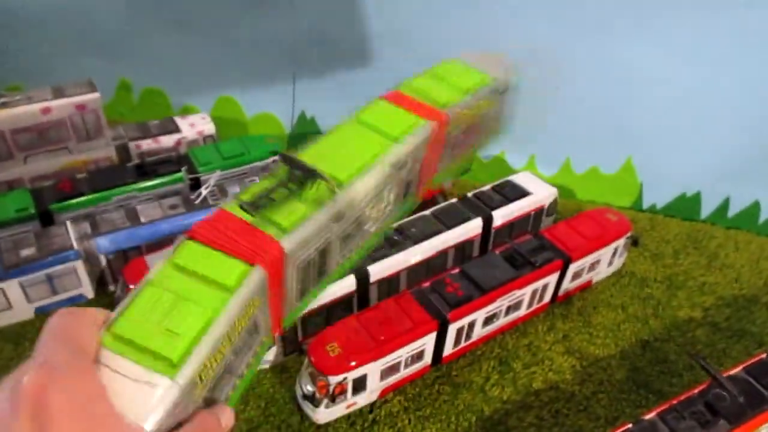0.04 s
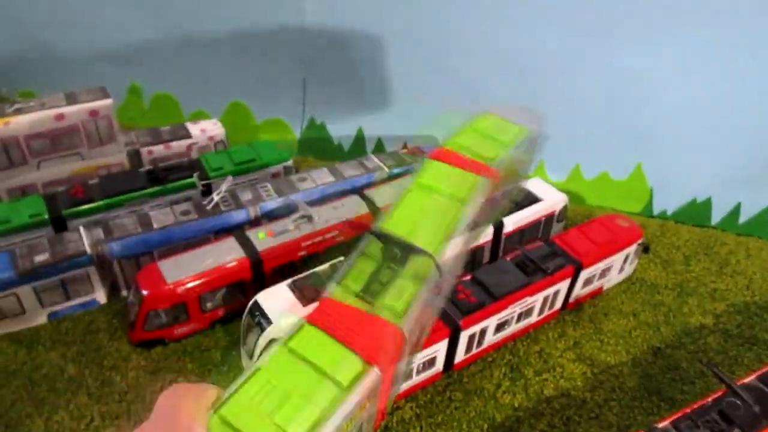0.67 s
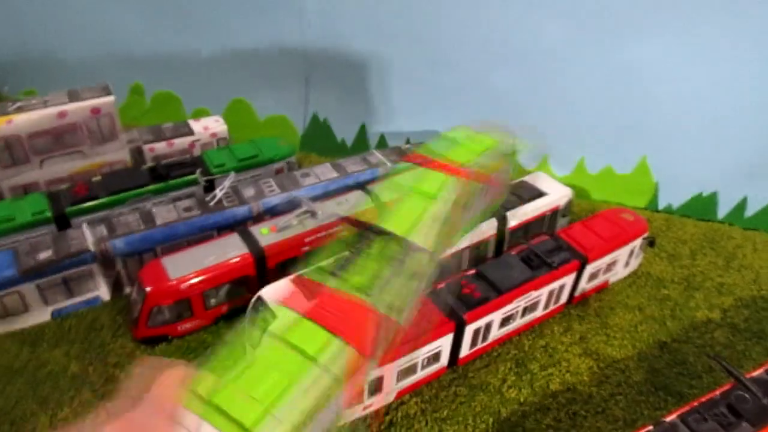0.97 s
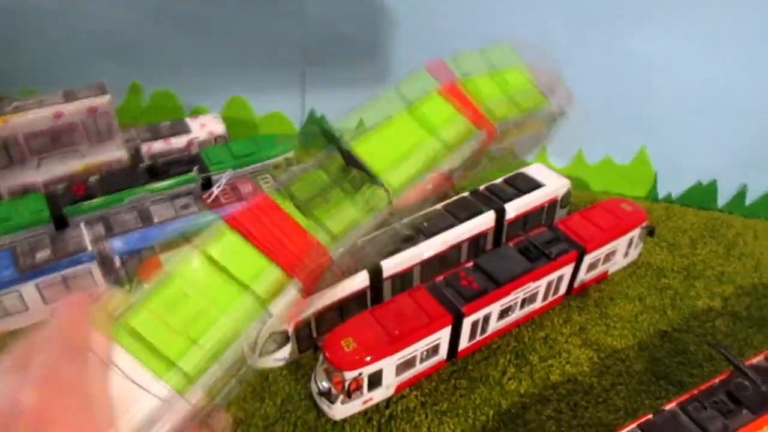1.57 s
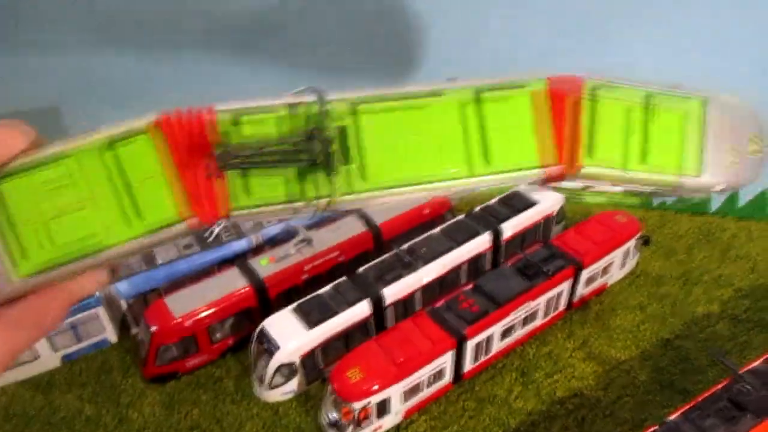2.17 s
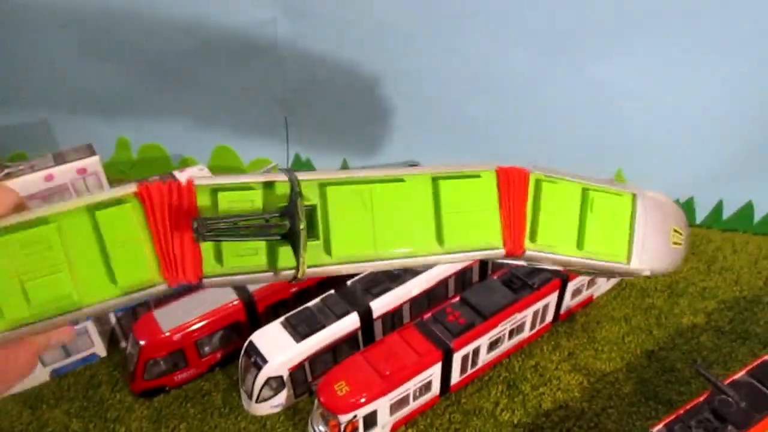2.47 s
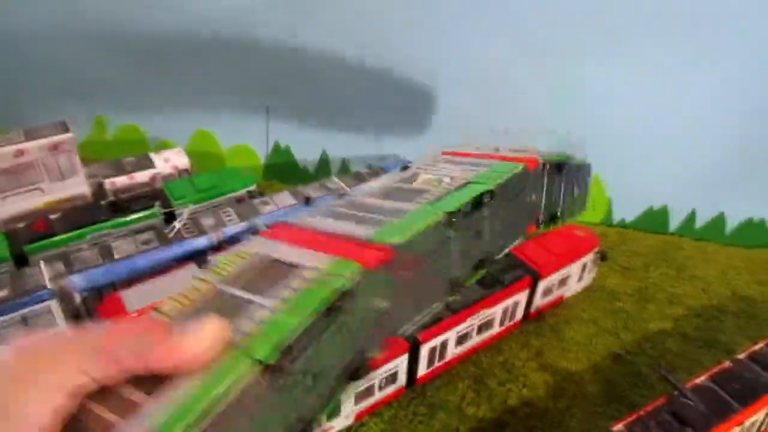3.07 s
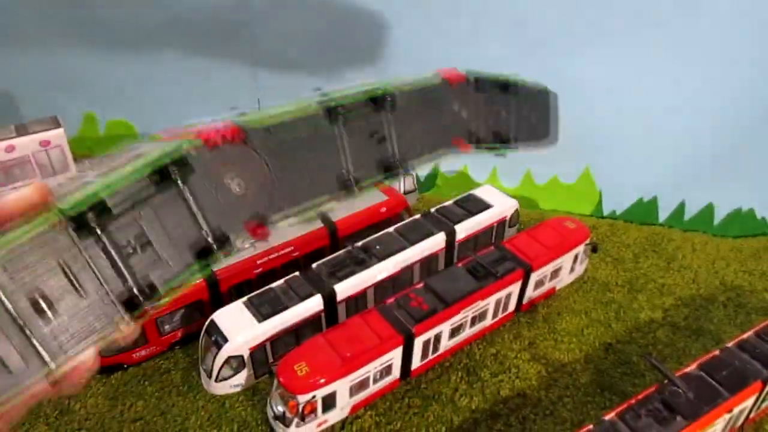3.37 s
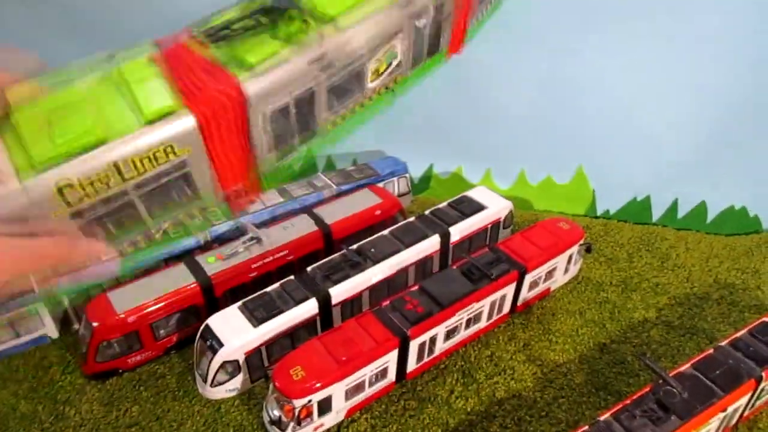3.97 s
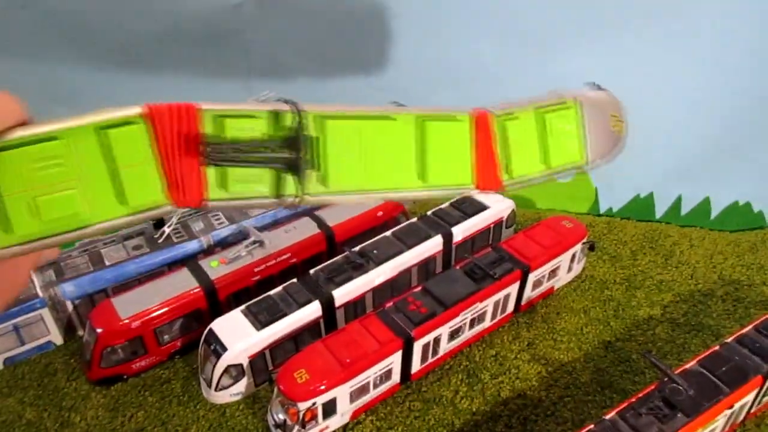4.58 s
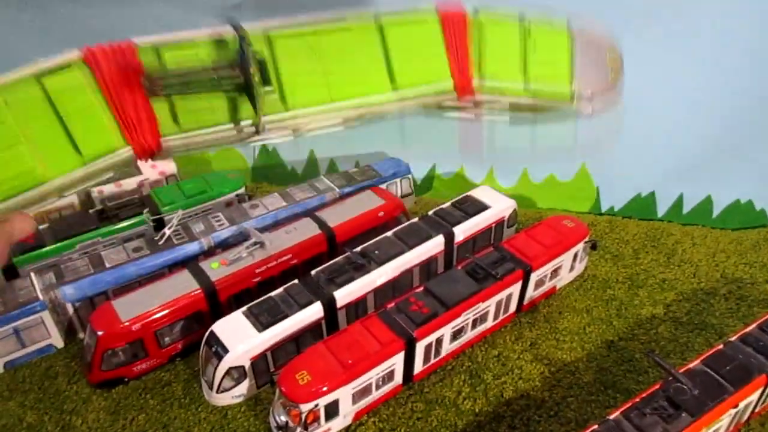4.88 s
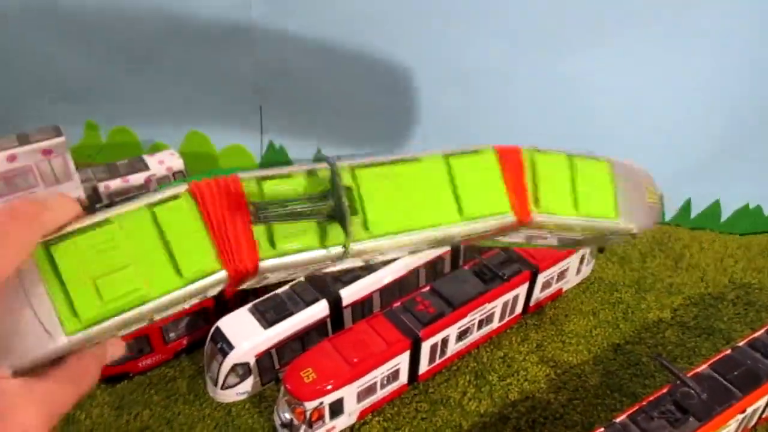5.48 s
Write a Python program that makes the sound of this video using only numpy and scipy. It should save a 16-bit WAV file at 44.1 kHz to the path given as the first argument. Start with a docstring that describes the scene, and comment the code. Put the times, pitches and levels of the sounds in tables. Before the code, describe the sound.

A jointed plastic toy tram is handled close to the microphone in a small room, with a fan humming faintly throughout. From the start to about 1.4 seconds, its sections and loose axles make quick, irregular, hollow clicks and clacks over soft joint rubbing and finger drag. From 0.4 seconds, some knocks land with a small thud and a rattling rebound. The taps thin out, with a knock near 1.9 seconds and a few faint ticks. Clatter builds again from 2.7 seconds to the strongest thudding knocks just after 3 seconds. Three soft, hollow tocks follow around 3.4 seconds. The rattling resumes from 3.7 to 4.2 seconds, with a brief scrape of the joints. At 4.5 seconds the gripping fingers make a short, dull rumble. The last knocks come between 4.8 and 5.3 seconds, with one light tap at 5.5.

```python
"""A jointed plastic toy tram is swung about and turned over in one hand, close up in a small room.
A fan hums faintly throughout. From the start the fingers drag, the joints rub, and sections and loose
axles knock together, each tap a short chatter of contacts that rings the hollow shell. From 0.4 s,
sections hit their end stops, thud and rebound. Near 3.4 s, with the toy upside down, come three soft
tocks; then the clatter resumes, and the grip rumbles at 4.5 s before the last knocks."""
import sys
import numpy as np
from scipy import signal
from scipy.fft import rfft, irfft
from scipy.io import wavfile

SR = 44100
rng = np.random.default_rng(int(sys.argv[2]) if len(sys.argv) > 2 else 0)


def transcribe(u):
    """Save the signal u as a 16-bit wav file named by the first command-line argument.

    u: samples, shape (n,) or (channels, n), limited to [-1, 1]; the rate is SR.
    q: integer samples, one column per channel.
    """
    v = np.clip(np.atleast_2d(u).T, -1, 1)
    q = np.round(v * 32767).astype(np.int16)
    wavfile.write(sys.argv[1], SR, q)


N = 244310
TAP_SAMPLES = 16384

# tone colour of the fan's air noise: frequency_hz, relative_density_db
FAN_AIR = [(20, -14), (45, -1.5), (70, -4.5), (130, -4.5), (200, -7.5), (300, -6.5), (400, -11.5),
           (680, -18.5), (880, -13.5), (1150, -23), (1950, -24), (2600, -28), (7500, -28), (16000, -40.5)]
# steady motor hum: pitch_hz, rms_db
FAN_HUM = [(49.5, -61.5), (100, -60.5), (140.5, -62), (281, -58)]
# wavering fan whine: pitch_hz, width_hz, rms_db
FAN_WHINE = [(892.4, 77, -58.5), (1898, 49, -65.5)]
# fingers dragging on the body: start_s, end_s, level_db
FINGER_DRAGS = [(0, 1.4, -58.5), (4.53, 4.83, -47)]
# joints sliding as the tram tilts: start_s, end_s, level_db
JOINT_SLIDES = [(1.5, 2.05, -68), (2.66, 2.92, -55), (3.78, 3.87, -38)]
# light taps of joints and axles: start_s, shell_level_db, crack_re_shell_db, chatter_s
LIGHT_TAPS = [(0.001, -25, -11.5, 0.015), (0.102, -26, -12.5, 0.0079), (0.226, -22, -3, 0.0015),
              (0.297, -23.5, -13, 0.0044), (0.334, -38, -12, 0.00065), (0.369, -38.5, -11, 0.00085),
              (0.429, -31, -1, 0.00061), (0.518, -25, -9.5, .005), (0.675, -26, -14, 0.0044),
              (0.718, -33, -14, .002), (0.757, -27.5, -14, 0.0051), (0.896, -26.5, -8.5, 0.0043),
              (0.995, -26, -8, .009), (1.048, -25, -11, 0.0061), (1.16, -29.5, 1.5, 0.0017),
              (1.253, -23.5, -12.5, 0.0046), (1.338, -27.5, -6, 0.011), (1.398, -23.5, -11.5, 0.0028),
              (1.744, -40.5, -10.5, 0.013), (1.909, -27, -2, 0.0028), (2.234, -41, -4, 0.0033),
              (2.262, -42.5, -8, 0.023), (2.697, -34.5, -10.5, 0.0031), (2.729, -36.5, -6, 0.0079),
              (2.769, -36.5, -11.5, 0.0032), (2.808, -42.5, -8, .004), (2.845, -28, -15.5, 0.0031),
              (2.95, -23.5, -12.5, 0.011), (3.13, -26, -5, 0.0022), (3.749, -29.5, -12, 0.0033),
              (3.791, -39, -21, 0.0065), (3.828, -32.5, -17, 0.0029), (3.867, -35, -16, 0.0019),
              (3.974, -40, -12, .001), (4.047, -23.5, -12, 0.0082), (4.085, -24, 0.5, 0.00058),
              (4.792, -40, -12.5, 0.0019), (4.877, -31.5, -11, 0.00063), (5.02, -25.5, -13.5, 0.0091),
              (5.15, -38.5, -7.5, .003), (5.165, -26.5, -17.5, 0.0037), (5.242, -30, -1, .0014),
              (5.531, -33.5, -9.5, 0.0041)]
# a section hits its end stop and rebounds:
# start_s, shell_level_db, crack_re_shell_db, chatter_s, thud_peak_db, rebound_delay_s, rebound_level_db
END_STOPS = [(0.387, -20, -4.5, 0.0038, -25, 0.023, -23), (0.619, -24, -4, 0.0038, -31, 0.033, -27),
             (0.776, -23.5, -3.5, 0.0022, -26.5, .013, -23.5),
             (1.132, -21.5, -1.5, 0.0047, -23.5, 0.012, -19.5), (1.874, -30.5, -2, 0.005, -32.5, 0.02, -23),
             (2.999, -23, -4, 0.0027, -31, 0.018, -30.5), (3.052, -21, -11.5, .007, -28.5, 0.071, -26),
             (3.068, -19.5, -3.5, 0.0065, -17, .018, -18.5), (4.206, -22, -3.5, 0.0037, -28.5, 0.029, -25),
             (4.894, -24, -3, 0.017, -24.5, 0.023, -23), (5.213, -29, -1.5, 0.0051, -25.5, 0.011, -26.5)]
# hollow ring of the air inside the body: pitch_hz, width_hz, gain_db
CAVITY_MODES = [(489.5, 45, -1), (540, 170, -0.5), (591, 85, 6), (672, 56, -0.5)]
# clack of the plastic walls: pitch_hz, width_hz, gain_db
SHELL_MODES = [(1034, 236, -3), (1095, 68, 5), (1244, 180, -3.5), (1380, 30, 3.5), (1464, 51, 1.5),
               (1684, 167, 2), (1980, 530, -1.5), (2215, 31, 2.5), (2293, 44, -1), (2760, 446, -3),
               (3227, 130, -2.5), (3560, 200, -.5), (3812, 470, 0.5), (4120, 1140, -6)]
# bright crack of edges and small hard parts: pitch_hz, width_hz, gain_db
EDGE_MODES = [(5740, 1470, 2), (7090, 810, 0), (7160, 630, -2.5), (7600, 2760, -4), (8600, 43, -7),
              (9150, 1800, -8), (11400, 170, -9), (11040, 7300, -6), (13400, 9000, -18)]
# low flex of the whole body: pitch_hz, width_hz, gain_db
BODY_MODES = [(184, 280, -6.5), (315, 330, -7.5), (448, 44, -0.5), (580, 74, 3)]
# soft hollow tocks: start_s, peak_db
SOFT_TOCKS = [(3.3318, -30.5), (3.4105, -27), (3.492, -31.5)]


def from_db(db):
    """Decibels to gain."""
    return 10 ** (np.asarray(db) / 20)


def rms_one(x):
    """Each row scaled to rms 1."""
    return x / np.sqrt(np.mean(x ** 2, axis=-1, keepdims=True) + 1e-30)


def unit_energy(taps):
    """Each tap gets the energy of 10 ms at rms 1."""
    return rms_one(taps) * np.sqrt(SR / 100 / TAP_SAMPLES)


def resonate(x, hz, width_hz):
    """A resonance with gain 1 at its peak."""
    r = np.exp(-np.pi * width_hz / SR)
    poles = [1, -2 * r * np.cos(2 * np.pi * hz / SR), r * r]
    return signal.lfilter(np.array([1, 0, -1]) * (1 - r * r) / 2, poles, x + 1e-18)


def band(x, low_hz, high_hz, order=2):
    """Butterworth band-pass."""
    return signal.sosfilt(signal.butter(order, [low_hz, high_hz], "band", fs=SR, output="sos"), x + 1e-18)


def place(times, sounds):
    """Lays each sound on the timeline."""
    margin = sounds.shape[1]
    track = np.zeros(N + 3 * margin)
    for start_s, sound in zip(times, sounds):
        at = margin + round(start_s * SR)
        track[at:at + margin] += sound
    return track[margin:margin + N]


def swells(rows, rise_s, fall_s):
    """Envelope from rows of start_s, end_s, level_db: each rises, holds and fades; their powers add."""
    t = np.arange(0, N, 64) / SR
    start, end, db = np.transpose(rows)[:, :, None]
    gains = from_db(db) * np.exp(-np.maximum(start - t, 0) / rise_s - np.maximum(t - end, 0) / fall_s)
    return np.interp(np.arange(N) / SR, t, np.sqrt(np.sum(gains ** 2, axis=0)))


def fan(air_db=-50.5):
    """The background bed: soft air noise with motor hum and a wavering whine."""
    air_hz, density_db = np.transpose(FAN_AIR)
    colour = from_db(np.interp(np.log(np.fft.rfftfreq(N, 1 / SR) + 1), np.log(air_hz), density_db))
    air = from_db(air_db) * rms_one(irfft(rfft(rng.standard_normal(N)) * colour, N))
    t = np.arange(N) / SR
    hum = sum(from_db(db) * np.sqrt(2) * np.sin(2 * np.pi * (hz * t + rng.random()))
              for hz, db in FAN_HUM)
    whine = sum(from_db(db) * rms_one(resonate(resonate(rng.standard_normal(N), hz, width), hz, width))
                for hz, width, db in FAN_WHINE)
    return air + hum + whine


def grip(body_db=3, bump_depth_db=2.0):
    """Fingers dragging on the body in small bumps make a dull rumble around its lowest mode."""
    bumps_db = bump_depth_db * rms_one(band(rng.standard_normal(N), 11.4, 24))
    drag = band(rng.standard_normal(N), 132, 319, order=3) * from_db(bumps_db)
    rumble = rms_one(drag + from_db(body_db) * resonate(drag, hz=182, width_hz=38))
    return swells(FINGER_DRAGS, rise_s=0.013, fall_s=0.04) * rumble


def grains(shape, per_s, uneven_db):
    """Tiny clicks at random moments, uneven in strength."""
    hits = rng.random(shape) < per_s / SR
    return hits * rng.choice([-1, 1], shape) * from_db(uneven_db * rng.standard_normal(shape))


def strike(clicks, modes, scatter_db=0, tilt_db_per_octave=0):
    """Rings the modes; with scatter, each tap lands on another spot and gets its own balance of them."""
    octaves = np.log2(np.array(modes)[:, 0] / modes[0][0])
    spot_db = scatter_db * rng.standard_normal((len(clicks), len(modes)))
    colour_db = spot_db + np.outer(tilt_db_per_octave, octaves)
    return sum((-1) ** k * from_db(db + colour_db[:, [k]]) * resonate(clicks, hz, width)
               for k, (hz, width, db) in enumerate(modes))


def knock_rows(start_s, shell_db, crack_db, chatter_s, cavity_db, hollower_db_per_db=0.6):
    """Cues for one kind of knock: the gentler it is among its kind, the hollower it sounds."""
    hollow_db = cavity_db + hollower_db_per_db * (shell_db.mean() - shell_db)
    return np.column_stack(np.broadcast_arrays(start_s, shell_db, hollow_db, crack_db, chatter_s))


def knock_cues():
    """Every knock: start_s, shell_level_db, cavity_re_shell_db, crack_re_shell_db, chatter_s."""
    start_s, shell_db, crack_db, chatter_s, _, delay_s, rebound_db = np.transpose(END_STOPS)
    stops = knock_rows(start_s, shell_db, crack_db, chatter_s, cavity_db=-10)
    # a rebound is a long, thin clatter
    rebounds = knock_rows(start_s + delay_s, rebound_db, crack_db=-9.5, chatter_s=0.012, cavity_db=-15.5)
    taps = knock_rows(*np.transpose(LIGHT_TAPS), cavity_db=-12)
    return np.vstack([stops, rebounds, taps])


def joint_motion(re_knock_db=-23, held_db=-62.5):
    """How hard the joints rub: swinging into and out of each knock, sliding, and faintly when held."""
    times, shell_db = knock_cues().T[:2]
    swings = swells(np.column_stack([times, times, shell_db + re_knock_db]), rise_s=0.065, fall_s=0.1)
    slides = swells(JOINT_SLIDES, rise_s=0.011, fall_s=0.051)
    return np.sqrt(swings ** 2 + slides ** 2 + from_db(held_db) ** 2)


def joint_rub(edge_db=-22):
    """The joints catch and slip in tiny grains that ring the walls and edges."""
    slips = grains((1, N), per_s=1100, uneven_db=5)
    walls = band(strike(slips, SHELL_MODES), 660, 2950)
    edges = from_db(edge_db) * strike(slips, EDGE_MODES)
    return joint_motion() * rms_one(walls + edges)[0]


def contacts(chatter_s, lead_s, first_touch_db=4, slide_db=-1.5, slide_share=0.47):
    """One row per tap: the parts slide briefly, meet, then bounce unevenly for about the chatter time."""
    t = (np.arange(TAP_SAMPLES) - round(lead_s * SR)) / SR
    clicks = grains((len(chatter_s), TAP_SAMPLES), per_s=3000, uneven_db=3.5)
    clicks[:, t == 0] = from_db(first_touch_db)
    slide = from_db(slide_db) * np.exp(-abs(t) / (slide_share * chatter_s[:, None]))
    bounce = np.exp(-abs(t) / (2 * chatter_s[:, None]))
    return clicks * np.where(t < 0, slide, bounce)


def in_room(clicks, t60_s, wet_db, predelay_s=0.0042):
    """Contacts plus diffuse reflections, whose power builds with each contact and dies with the room."""
    decay = from_db(-120 / (t60_s * SR))
    power = signal.lfilter([1 - decay], [1, -decay], clicks ** 2)
    late_power = np.pad(power, ((0, 0), (round(predelay_s * SR), 0)))[:, :TAP_SAMPLES]
    return clicks + from_db(wet_db) * np.sqrt(late_power) * rng.standard_normal(clicks.shape)


def tinkle(clicks, low_hz=8900, high_hz=11000, width_hz=35, count=2):
    """Each tap sets off a faint, high metallic ring around 9-11 kHz."""
    pitches = rng.uniform(low_hz, high_hz, (len(clicks), count))
    return np.array([sum(resonate(tap, hz, width_hz) for hz in row) for tap, row in zip(clicks, pitches)])


def rattle(lead_s=0.012, tinkle_db=-15):
    """The same contacts drive four layers: hollow cavity, clacking walls, bright edges, metallic ring."""
    times, shell_db, cavity_db, crack_db, chatter_s = knock_cues().T
    clicks = contacts(chatter_s, lead_s)
    cavity = strike(in_room(clicks, t60_s=0.27, wet_db=-2), CAVITY_MODES, scatter_db=4)
    cavity = unit_energy(band(cavity, 353, 813))
    shell = strike(in_room(clicks, t60_s=0.2, wet_db=-4.5), SHELL_MODES, scatter_db=1.4)
    shell = unit_energy(band(shell, 570, 7600))
    hardness = 1.44 * (crack_db + 5.5)  # a harder contact reaches further up into the treble
    edges = strike(in_room(clicks, t60_s=0.19, wet_db=-6), EDGE_MODES,
                   scatter_db=4.5, tilt_db_per_octave=hardness)
    metallic_ring = from_db(tinkle_db) * unit_energy(tinkle(clicks))
    crack = unit_energy(band(edges, 4700, 13800)) + metallic_ring
    taps = shell + from_db(cavity_db)[:, None] * cavity + from_db(crack_db)[:, None] * crack
    return place(times - lead_s, from_db(shell_db)[:, None] * taps)


def thuds(lead_s=0.002, echo_s=0.0105, echo_db=-7):
    """An end stop flexes the whole body just ahead of the clack; a near surface throws the thud back."""
    stop_s, _, _, _, peak_db, _, _ = np.transpose(END_STOPS)
    times = stop_s - lead_s
    push = signal.unit_impulse(TAP_SAMPLES) * np.ones((len(times), 1))
    flex = band(strike(push, BODY_MODES, scatter_db=2.4), 94, 680)
    flex = from_db(peak_db)[:, None] * flex / abs(flex).max(axis=1, keepdims=True)
    return place(times, flex) + from_db(echo_db) * place(times + echo_s, flex)


def tocks(ring_delay_s=0.00586, ring_db=-11):
    """A soft contact gives two or three cycles near 1 kHz, then a lower, longer ring."""
    times, peak_db = np.transpose(SOFT_TOCKS)
    click = signal.unit_impulse(TAP_SAMPLES)
    attack = band(click, 850, 1260, order=3)
    ring = resonate(band(click, 480, 1100), hz=593, width_hz=35)
    gain = from_db(peak_db)[:, None]
    attacks = place(times, gain * attack / abs(attack).max())
    rings = place(times + ring_delay_s, gain * ring / abs(ring).max())
    return attacks + from_db(ring_db) * rings


def scene():
    """The toy up front and the fan behind, in mono."""
    return (rattle() + thuds() + joint_rub() + tocks() + grip() + fan())[None, :]


def record(dry, notch_hz=4790, notch_width_hz=520, cutoff_hz=16000):
    """The microphone has a deep notch in the upper mids; the top is cut."""
    for _ in range(2):
        dry = dry - 0.64 * resonate(dry, notch_hz, notch_width_hz)
    return signal.sosfilt(signal.ellip(10, 0.2, 80, cutoff_hz, fs=SR, output="sos"), dry)


dry = scene()
out = record(dry)
transcribe(out)
```